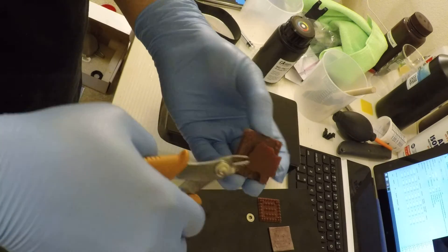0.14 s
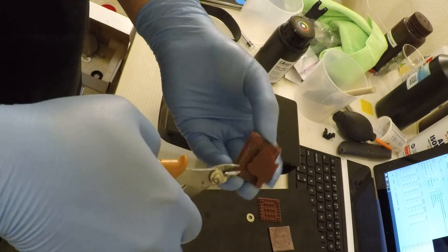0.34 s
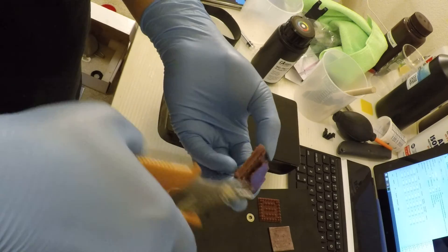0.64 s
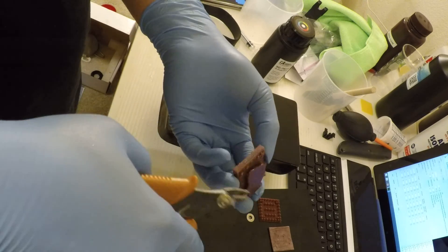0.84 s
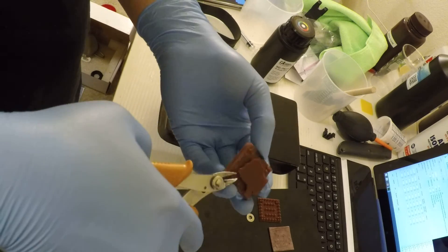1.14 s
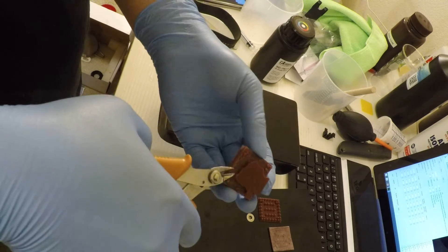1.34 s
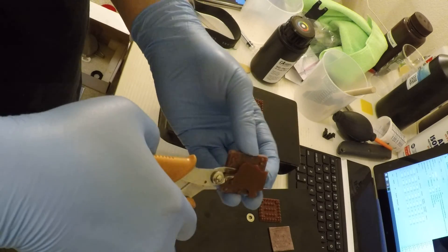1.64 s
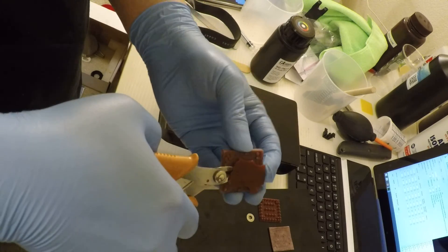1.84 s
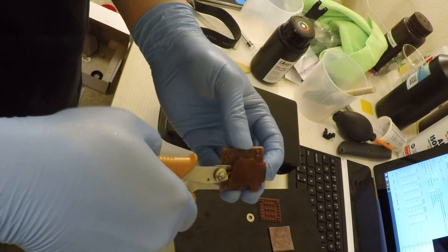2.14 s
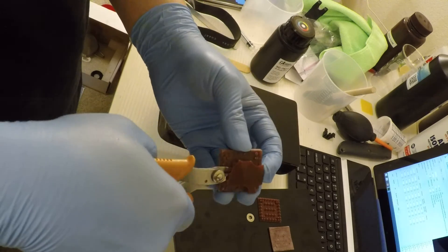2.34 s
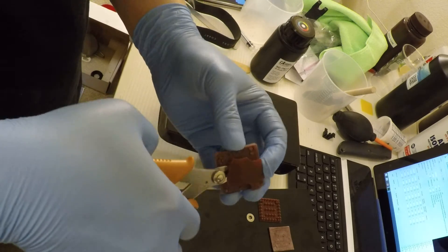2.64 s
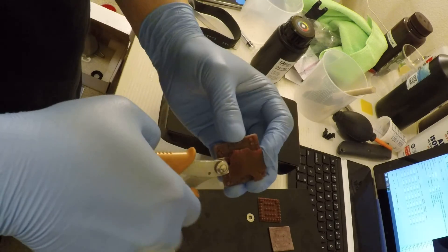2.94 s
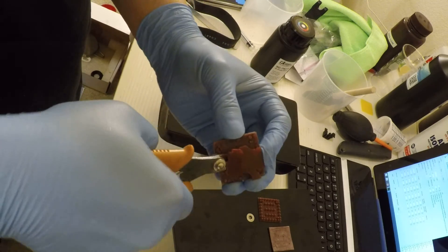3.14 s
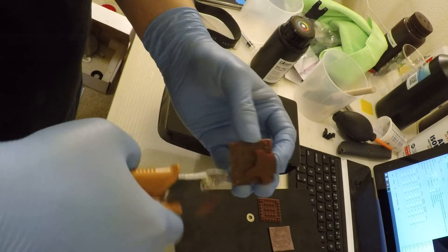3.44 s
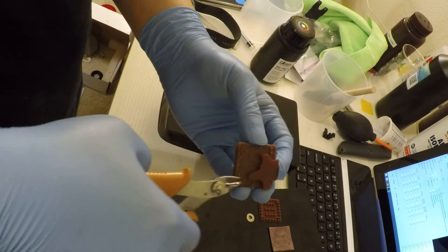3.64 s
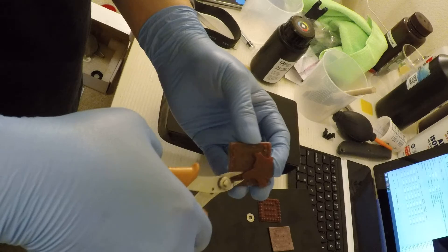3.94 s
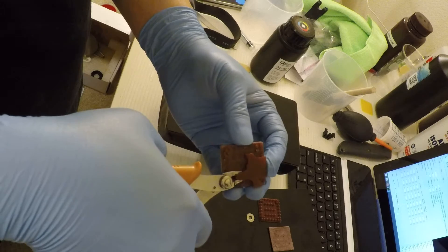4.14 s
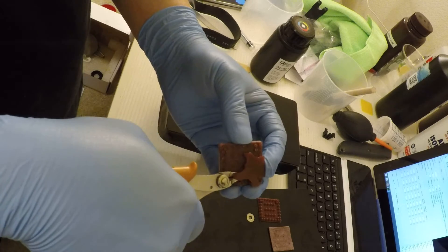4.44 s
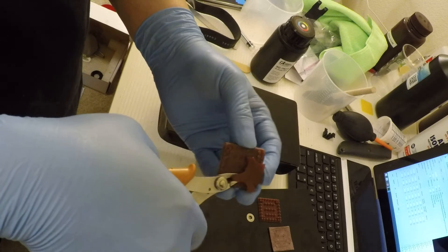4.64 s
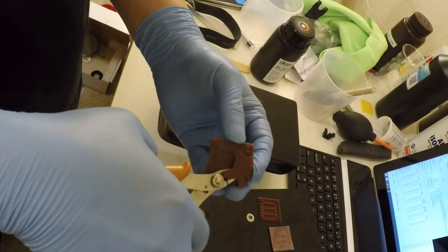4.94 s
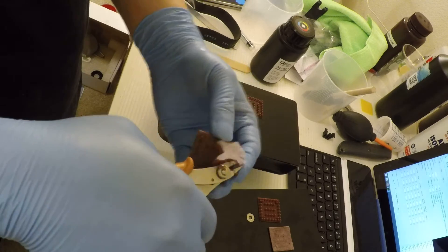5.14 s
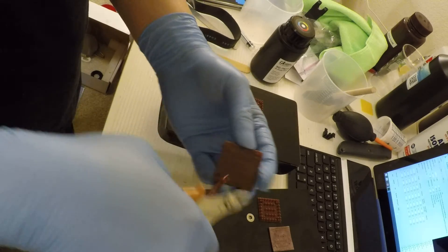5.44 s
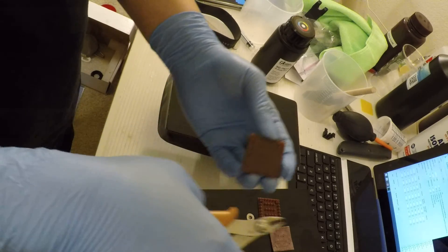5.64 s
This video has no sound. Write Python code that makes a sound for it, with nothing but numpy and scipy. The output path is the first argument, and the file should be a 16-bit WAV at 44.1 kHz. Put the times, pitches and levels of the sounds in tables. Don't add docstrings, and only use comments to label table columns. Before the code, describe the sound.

Nearly two seconds of mains hum, buzz and soft hiss, then a quick cluster of dry plastic snaps. More single cracks come, with crumbling ticks and a faint glove rustle. A very loud double crack with ringing blades follows, then small scrapes and weak snaps, and a chip rattles on a box with a short room reply.

```python
import sys
import numpy as np
from scipy import signal
from scipy.fft import rfft, irfft
from scipy.io import wavfile
from scipy.ndimage import uniform_filter1d

SR = 44100
rng = np.random.default_rng(int(sys.argv[2]) if len(sys.argv) > 2 else 0)


def waveform_to_disk(signal):
    frames = np.transpose(np.atleast_2d(signal))
    scaled = np.clip(frames, -1, 1) * 32767
    samples = np.round(scaled).astype(np.int16)
    wavfile.write(sys.argv[1], SR, samples)


def ratio(d):
    e = np.asarray(d, float) / 20
    return 10 ** e


N = 256220

# [f/Hz, level/dB per Hz]
HISS_COLOUR = [(40, -23), (80, -5.5), (125, -7), (190, -15), (330, -16), (450, -20.5), (780, -19),
               (1500, -25), (3000, -32), (6500, -36), (10000, -42), (14500, -43), (15200, -59),
               (15350, -76.5)]
# [f/Hz, level/dB per Hz]
RUMBLE_COLOURS = [
    [(10, -24.5), (25, 11.5), (47, 10.5), (55, 11), (65, -38)],
    [(45, -11), (55, 22), (68, 12.5), (80, 6.5), (100, -42)],
]
# [t/s, level/dB]
RUMBLE_EFFORT = [(0, -50.5), (1.2, -50), (1.7, -50), (2.2, -56), (3.2, -50), (4.3, -54), (4.8, -53),
                 (5.2, -51), (5.81, -56.5)]
# [multiple, level/dB rms]
BUZZ_HARMONICS = [(1, -51), (2, -62), (3, -73), (5, -76), (6, -78), (9, -83), (11, -84), (14, -85),
                  (22, -85), (27, -90), (29, -77), (30, -79), (31, -92), (37, -91), (38, -92), (41, -98),
                  (42, -89), (43, -82), (45, -81), (46, -83), (47, -85), (48, -91), (49, -95), (50, -87),
                  (51, -85), (53, -86), (54, -85), (55, -90), (56, -101), (59, -89)]
# [t/s, shift/periods]
BUZZ_SLIPS = [
    (.6, .5),
    (3.365, .25),
    (3.47, -.25),
    (4.04, .25),
    (4.505, -.25),
    (5.76, .25),
]
# [t/s, f/Hz, level/dB]
WHINE_GLIDES = [
    [(1.55, 400, -64), (1.8, 413, -68), (2.3, 420, -66)],
    [(2.2, 350, -77), (2.5, 362.5, -66), (2.85, 369, -60.5), (2.95, 370, -90)],
    [(2.7, 398, -75), (3.0, 406, -71), (3.25, 404, -80)],
]
# [t/s, blow/dB, hardness/dB per octave]
CHIP_KNOCKS = [
    (3.6989, -12, -2.5),
    (3.7014, -16.5, 2.5),
    (3.7040, -33, 3),
    (3.715, -39, -8),
    (3.8182, -46, 2),
    (3.821, -32.5, 0.5),
    (3.8253, -44, 7),
    (5.7496, -11.5, 1.5),
    (5.7530, -26.5, 5.5),
    (5.7680, -43, 5),
]
# [f/Hz, level/dB, t60/s]
BOX_MODES = [(272, -9, 0.021), (533, -24, 0.091), (1280, -30, 0.0088), (1720, -20.5, 0.0089),
             (1840, -1.5, 0.018), (2210, -4.5, 0.01), (2400, -4, 0.0047), (2760, -10.5, 0.011),
             (3200, -5, 0.0058), (3740, -11.5, 0.007), (4500, -11, 0.0063), (6000, -9, 0.004),
             (8100, -12.5, 0.0032), (11500, -17, 0.0026)]
# [t/s, level/dB]
BLADE_SCRAPES = [
    [(4.92, -73), (4.924, -77), (4.932, -59.5), (4.994, -60), (5.0, -72)],
    [(4.775, -45), (4.781, -58.5), (4.813, -62), (4.83, -76.5)],
    [(5.193, -53), (5.21, -53), (5.24, -66), (5.26, -75)],
]
# [f/Hz, level/dB per Hz]
GRIT_COLOUR = [(880, -44), (1500, -3), (2650, -7), (6120, -7), (7500, -14), (10000, -5.5), (15000, -32)]
# [t/s, level/dB]
GLOVE_SHUFFLE = [(3.8, -57), (3.81, -76), (3.822, -53), (3.832, -53), (3.876, -68.5), (3.918, -54.5),
                 (4.06, -66.5)]
# [f/Hz, level/dB per Hz]
GLOVE_COLOUR = [(300, -4), (600, -6.5), (1200, -7), (2500, -18), (6000, -22), (9000, -54)]
# [t/s, blade peak/dB, handle thud/dB]
JAW_CLASHES = [
    (4.4178, -15.5, -41.5),
    (4.4212, -10, -38),
    (3.3922, -42, -51),
]
# [f/Hz, level under the clash/dB, t60/s]
SHIVER_MODES = [(4700, 0.5, 0.16), (5012, -9.5, 0.42), (5360, -1, 0.12), (5561, 0.5, 0.14),
                (5890, -8.5, 0.16), (6300, -1.5, 0.12), (6470, -8, 0.219)]
# [t/s, snap peak/dB,
# snap f/Hz, part peak/dB]
BLADE_TICKS = [(1.7931, -52, 7450, -51), (1.8836, -49, 8830, -49), (1.89, -60, 8290, -45),
               (2.4662, -49, 6700, -53), (2.4789, -39.5, 9600, -50), (2.4949, -50, 9670, -62),
               (2.684, -40, 9900, -52), (2.7019, -50, 8570, -44), (2.8681, -57, 7450, -54),
               (2.8875, -51, 7800, -64), (3.1125, -37, 10100, -66), (3.369, -44, 6700, -56),
               (3.4022, -23, 8660, -65), (3.4124, -36, 8510, -48), (3.413, -32, 9070, -54),
               (3.0979, -55, 10080, -41), (4.017, -39, 11760, -46), (4.7387, -60, 6500, -38.5),
               (4.7426, -40.5, 6670, -67), (4.8107, -43, 10920, -52), (4.8498, -44.5, 9700, -60),
               (4.9333, -58, 6500, -45), (5.0668, -57, 9170, -66), (5.0863, -49, 10470, -68),
               (5.1286, -47.5, 10660, -62), (5.28, -57, 7540, -52), (5.294, -40.5, 6000, -45),
               (5.3525, -64, 8610, -47), (5.376, -53, 6680, -58), (5.4574, -45, 6500, -62)]
# [start t/s, length/s, snap peak/dB, snap f/Hz, part peak/dB]
CRUMBLE_RUNS = [
    (2.2064, 0.011, -35, 7500, -53),
    (3.002, 0.0077, -41, 14300, -57),
    (3.2744, 0.0079, -42, 11500, -58),
    (3.887, 0.0061, -64, 6500, -51.5),
    (3.977, 0.0046, -44, 11300, -52),
    (4.771, .004, -57, 7960, -40),
    (4.8766, .004, -54, 6500, -50.5),
    (4.973, 0.023, -48.5, 9500, -62),
    (5.19, .007, -38, 9900, -51),
    (5.2003, 0.0079, -36.5, 6200, -51.5),
]
# [t/s, snap peak/dB, snap f/Hz, part peak/dB, part
# f/Hz]
PILLAR_BREAKS = [(2.2049, -8, 8130, -27.5, 3200), (2.2051, -15.5, 12800, -40, 2470),
                 (2.2483, -8.5, 8060, -54, 3600), (2.2502, -23, 7740, -33.5, 3600),
                 (2.2532, -7.5, 9500, -33.5, 3700), (2.9987, -19.5, 8660, -38, 2820),
                 (2.9988, -24, 13600, -45, 2000), (3.1022, -21, 8340, -35.5, 3470),
                 (3.273, -8.5, 9550, -36.5, 2530), (3.3922, -2, 9070, -29.5, 2090),
                 (3.9104, -38.5, 12300, -36.5, 2250), (3.9476, -54, 6000, -35.5, 2370),
                 (4.4169, -24, 9000, -13.5, 2400), (4.4193, -27.5, 12830, -13.5, 3100),
                 (4.4178, -3, 9880, -13, 2600), (4.4212, 2, 10900, -16, 2840), (4.4215, 1, 7400, -29, 3040),
                 (4.4248, -10, 8600, -29.5, 3260), (4.7717, -36, 6500, -33.5, 3610),
                 (5.1906, -23.5, 10620, -33, 2420), (5.4538, -34, 7190, -45, 1420)]
# [f/Hz, t60/s]
ROOM_DECAY = [(1000, 0.34), (2600, 0.26), (5000, 0.29), (9000, 0.25), (15000, 0.17)]
# [f/Hz, level/dB]
ROOM_COLOUR = [(1000, -2), (2600, -5.5), (5000, -3), (9000, -6.5), (12000, -2.5), (15000, 7), (15700, -39)]
# [delay/ms, level/dB]
WALL_ECHOES = [(1.5, -35), (3.5, -37.5), (10, -26)]

BLADE_HZ = 5100
SNAP_RISE_MS, BLADE_RISE_MS, PART_RISE_MS = .062, .115, .25


def evened(x):
    return x / np.sqrt(np.mean(x ** 2) + 1e-20)


def read(points, hz):
    f, value = np.transpose(points)
    return np.interp(np.log(hz + 1), np.log(f + 1), value)


def add(mix, s, sound):
    part = mix[round(s * SR):][:len(sound)]
    part += sound[:len(part)]


def coloured(points, size):
    hz = np.fft.rfftfreq(size, 1 / SR)
    spectrum = rfft(rng.standard_normal(size)) * ratio(read(points, hz))
    return evened(irfft(spectrum, size))


def burst(db, hz, rise_ms, phase):
    t = np.arange(400) / SR
    u = 500 * t / rise_ms
    envelope = (u * np.exp(1 - u)) ** 2
    return ratio(db) * envelope * np.sin(2 * np.pi * (hz * t + phase))


def air():
    hiss_db = -57
    trims_db, follows = (-3, -0.5), (1.2, -.3)
    gusts_db, gusts_s = (1.5, 2), (.25, 0.18)
    s, db = np.transpose(RUMBLE_EFFORT)
    mean_db = db.mean()
    swell_db = np.interp(np.arange(N) / SR, s, db) - mean_db
    out = ratio(hiss_db) * coloured(HISS_COLOUR, N)
    registers = zip(RUMBLE_COLOURS, trims_db, follows, gusts_db, gusts_s)
    for colour, trim_db, follow, gust_db, gust_s in registers:
        slow = uniform_filter1d(rng.standard_normal(N), round(gust_s * SR))
        gust = evened(uniform_filter1d(slow, 2000))
        level_db = mean_db + trim_db + follow * swell_db + gust_db * gust
        out += ratio(level_db) * coloured(colour, N)
    return out


def buzz():
    buzz_hz, slip_s = 256.685, 0.00047
    hum_hz, hum_db = 120.7, -57
    t = np.arange(N) / SR
    turns = buzz_hz * t
    for s, periods in BUZZ_SLIPS:
        turns += periods * np.clip((t - s) / slip_s, 0, 1)
    out = ratio(hum_db) * np.sin(2 * np.pi * hum_hz * t)
    for k, db in BUZZ_HARMONICS:
        out += ratio(db) * np.sin(2 * np.pi * (round(k) * turns + rng.random()))
    return np.sqrt(2) * out


def whines():
    out = np.zeros(N)
    for rows in WHINE_GLIDES:
        s, hz, db = np.transpose(rows)
        t = np.arange(s[0], s[-1], 1 / SR)
        waver = evened(uniform_filter1d(rng.standard_normal(len(t)), 3000))
        turns = np.cumsum(np.interp(t, s, hz) + 6 * waver) / SR
        level = ratio(np.interp(t, s, db) + 0.7 * waver[::-1])
        add(out, s[0], level * np.sin(2 * np.pi * turns))
    return out


def knocks():
    spot_db, spot_detune, contact_s = 1.4, 0.018, .00016
    out, t = np.zeros(N), np.arange(4000) / SR
    hz, db, t60 = np.transpose(BOX_MODES)[:, :, None]
    sign = np.where(hz < 1400, -1, 1)
    contact = 1 - np.exp(-t / contact_s)
    spots = rng.standard_normal((len(CHIP_KNOCKS), 2, len(BOX_MODES), 1))
    for (s, blow_db, hard_db), luck in zip(CHIP_KNOCKS, spots):
        start_db = blow_db + db + hard_db * np.log2(hz / 1800) + spot_db * luck[0]
        tones = np.sin(2 * np.pi * hz * (1 + spot_detune * luck[1]) * t)
        rings = sign * ratio(start_db - 60 * t / t60) * tones
        add(out, s, contact * rings.sum(0))
    return signal.lfilter(*signal.butter(2, 1250, "high", fs=SR), out)


def scrapes():
    out = np.zeros(N)
    colours = (GRIT_COLOUR, GRIT_COLOUR, GRIT_COLOUR, GLOVE_COLOUR)
    for rows, colour in zip(BLADE_SCRAPES + [GLOVE_SHUFFLE], colours):
        s, db = np.transpose(rows)
        t = np.arange(s[0], s[-1], 1 / SR)
        grain = ratio(10.0 * uniform_filter1d(rng.standard_normal(len(t)), 30))
        rasp = evened(grain * coloured(colour, len(t)))
        add(out, s[0], ratio(np.interp(t, s, db)) * rasp)
    return out


def clashes():
    thud_hz, thud_rise_ms = 600, 0.32
    shiver_db, shiver_rise_s = -36, .004
    out, t = np.zeros(N), np.arange(SR // 2) / SR
    hz, db, t60 = np.transpose(SHIVER_MODES)[:, :, None]
    t60 = np.minimum(t60, .4)
    phases = rng.random((len(JAW_CLASHES), len(SHIVER_MODES), 1))
    for (s, steel_db, thud_db), phase in zip(JAW_CLASHES, phases):
        add(out, s, burst(steel_db, BLADE_HZ, BLADE_RISE_MS * 1.4, phase[0]))
        add(out, s, burst(thud_db, thud_hz, thud_rise_ms, 0.5))
        level = ratio(steel_db + shiver_db + db - 60 * t / t60)
        shiver = level * np.sin(2 * np.pi * (hz * t + phase))
        add(out, s, np.minimum(t / shiver_rise_s, 1) * shiver.sum(0))
    return out


def blade_db(snap_db, part_db):
    return 20 * np.log10(ratio(snap_db - 25.5) + ratio(part_db - 4.5))


def crumbs():
    count, spread_db, detune = 5, 8, .2
    rows = []
    lucks = rng.uniform(-0.69, 1, (len(CRUMBLE_RUNS), count, 4))
    for (s, length, snap_db, hz, part_db), luck in zip(CRUMBLE_RUNS, lucks):
        at = s + length * (np.arange(count) + luck[:, 0] / 4) / (count - 1)
        snaps_db = snap_db + spread_db * luck[:, 1]
        snaps_hz = hz * (1 + detune * luck[:, 2] ** 3)
        parts_db = part_db + spread_db * luck[:, 3]
        rows += zip(at, snaps_db, snaps_hz, parts_db)
    return rows


def creak():
    start_s, gap_s, count = 3.0713, .0072, 5
    return [(start_s + k * gap_s, -47 + k * 1.2, 9500, -48, -60, 1950) for k in range(count)]


def slips():
    rebound_s, rebound_db = .0015, -10.5
    part_low_hz, part_span_hz = 1950, 1200
    rows, small = [], []
    for s, snap_db, hz, part_db, part_hz in PILLAR_BREAKS:
        rows.append((s, snap_db, hz, blade_db(snap_db, part_db), part_db, part_hz))
        small.append((s + rebound_s, -80, hz, part_db + rebound_db))
    small += BLADE_TICKS + crumbs()
    for (s, snap_db, hz, part_db), luck in zip(small, rng.random(len(small))):
        part_hz = part_low_hz + part_span_hz * luck
        rows.append((s, snap_db, hz, blade_db(snap_db, part_db), part_db, part_hz))
    return rows + creak()


def cracks():
    spit_hz, spit_db = 13800, -16.5
    soft_rise = 0.4
    out = np.zeros(N)
    rows = slips()
    for (s, snap_db, snap_hz, steel_db, part_db, part_hz), luck in zip(rows, rng.random((len(rows), 5))):
        snap_rise_ms = SNAP_RISE_MS * (1 - soft_rise * snap_db / 50)
        steel_hz = BLADE_HZ * (0.944 + 0.11 * luck[3])
        sound = burst(snap_db, snap_hz, snap_rise_ms, luck[0])
        sound += burst(snap_db + spit_db, spit_hz, SNAP_RISE_MS, luck[4])
        sound += burst(steel_db - 0.5, steel_hz, BLADE_RISE_MS, luck[1])
        sound += burst(part_db - 1.5, part_hz, PART_RISE_MS, luck[2])
        add(out, s - .00015, sound)
    return signal.sosfilt(signal.butter(5, 1500, "high", fs=SR, output="sos"), out)


def room(x, near_db, near_t60, far_db, build_s):
    wall_s, wall_spread_s, wall_peak_db = 0.02, 0.0042, 5
    t = np.arange(SR // 2) / SR
    taps = np.zeros(len(t))
    at = np.arange(40, len(t) - 12, 12)
    taps[at + rng.integers(0, 12, len(at))] = rng.choice([-1., 1.], len(at))
    near = taps * ratio(-60 * t / near_t60)
    wall_db = wall_peak_db * np.exp(-((t - wall_s) / wall_spread_s) ** 2)
    tail = taps * np.minimum(t / build_s, 1) * ratio(wall_db)
    hz, frame_s, z = signal.stft(tail, SR, nperseg=128)
    z = z * ratio(read(ROOM_COLOUR, hz)[:, None] - 60 * frame_s / read(ROOM_DECAY, hz)[:, None])
    far = signal.istft(z, SR, nperseg=128)[1][:len(t)]
    reply = ratio(near_db) * near / np.linalg.norm(near) + ratio(far_db) * far / np.linalg.norm(far)
    for ms, db in WALL_ECHOES:
        add(reply, ms / 1000, ratio([db]))
    return x + signal.fftconvolve(x, reply)[:N]


def scene():
    background = air() + buzz() + whines()
    far = room(knocks(), near_db=-20, near_t60=0.019, far_db=-7.5, build_s=0.0058)
    work = scrapes() + clashes() + cracks()
    near = room(work, near_db=-16, near_t60=.006, far_db=-13.5, build_s=0.0051)
    return (background + far + near)[None]


def band_limit(x):
    return signal.sosfilt(signal.butter(12, 16390, fs=SR, output="sos"), x)


def record(dry):
    edge_hz, edge_db = 15250, -17
    levels = ratio([0, 0, edge_db, edge_db])
    edge = signal.firwin2(511, [0, edge_hz, edge_hz + 150, SR / 2], levels, fs=SR)
    heard = signal.oaconvolve(dry, edge[None], "same")
    mix = np.clip(heard, -1, 1)
    return band_limit(mix)


dry = scene()
out = record(dry)
waveform_to_disk(out)
```